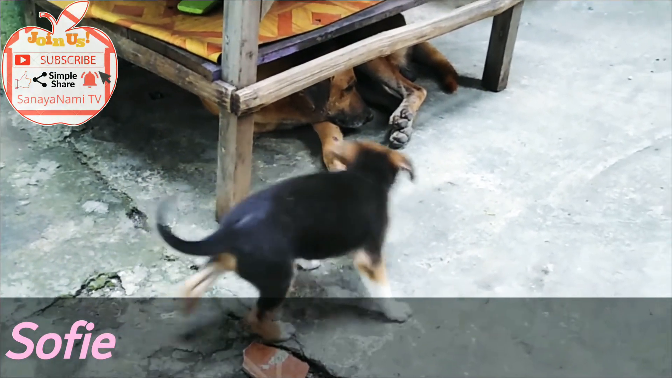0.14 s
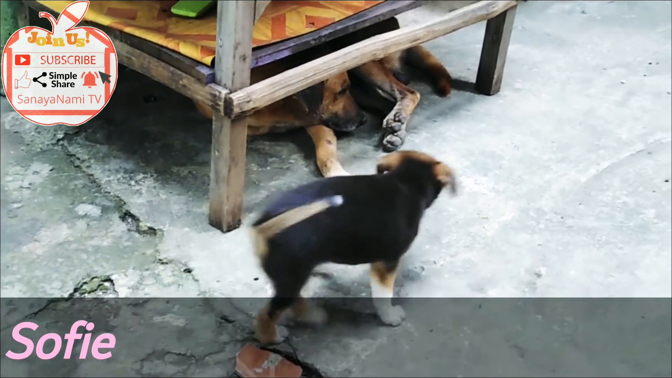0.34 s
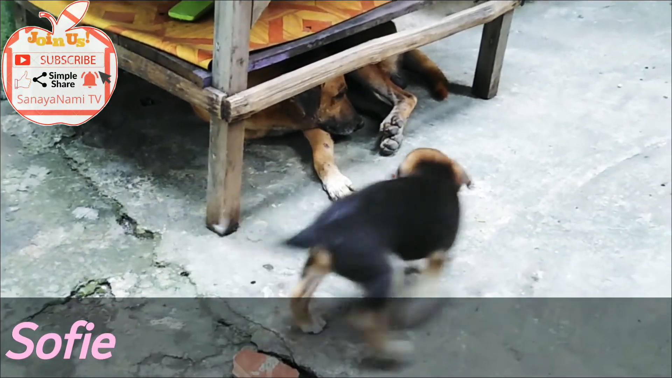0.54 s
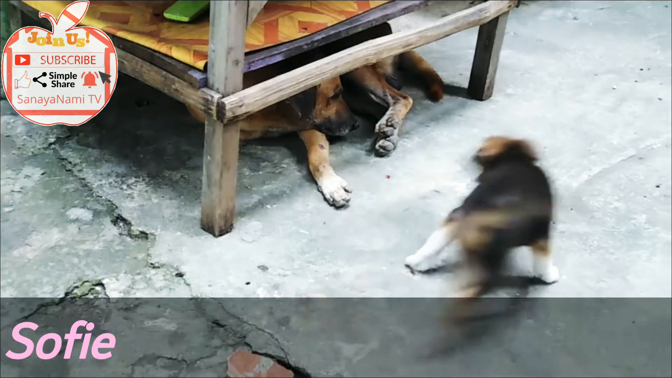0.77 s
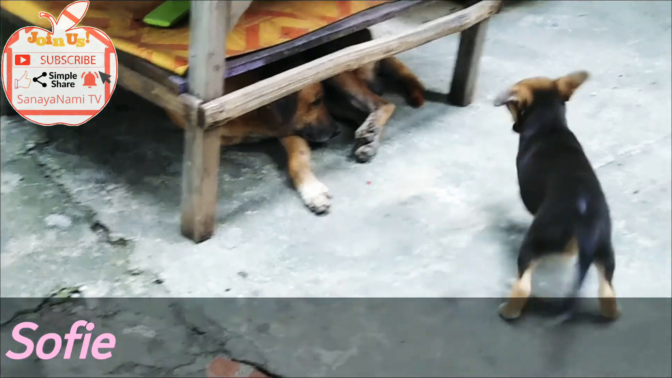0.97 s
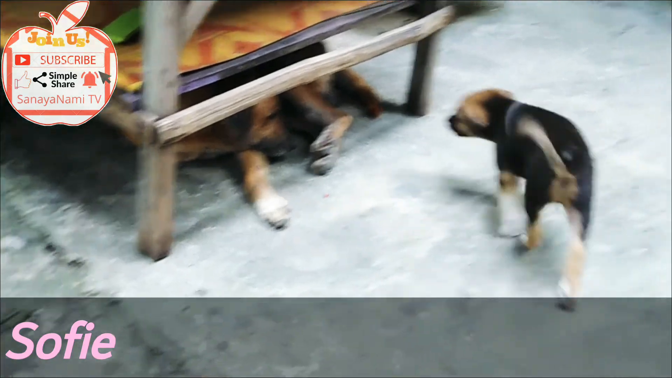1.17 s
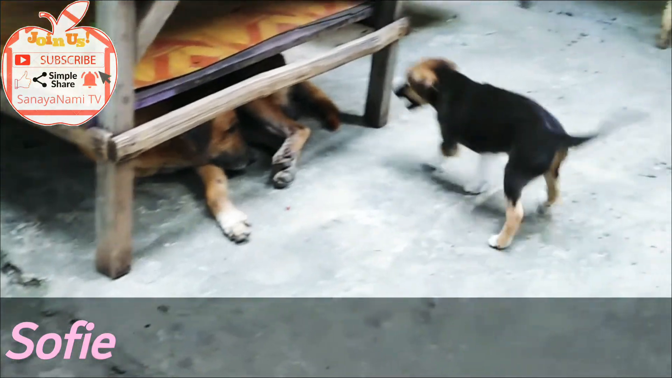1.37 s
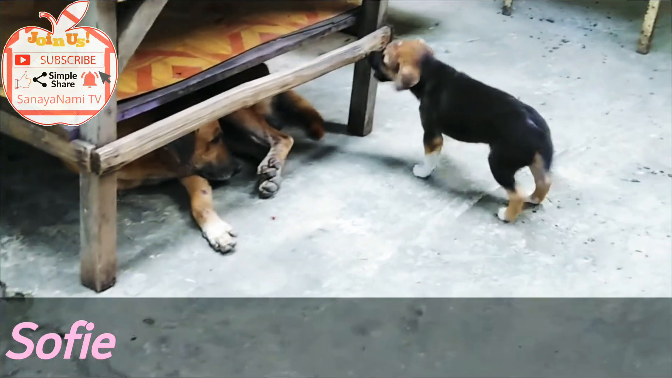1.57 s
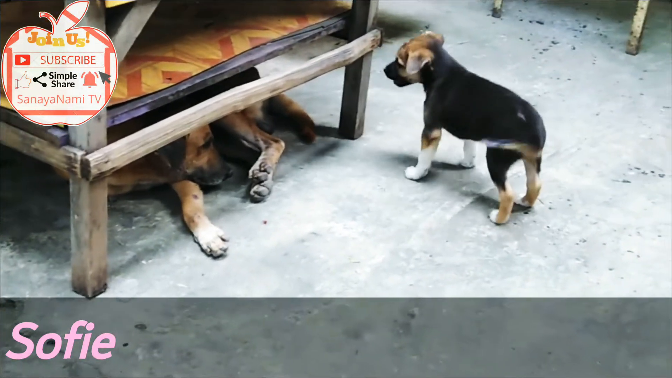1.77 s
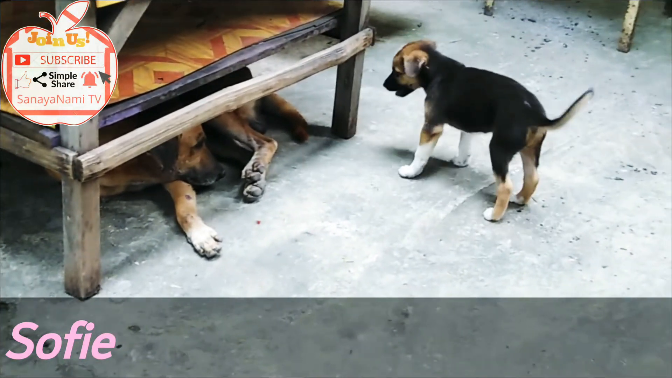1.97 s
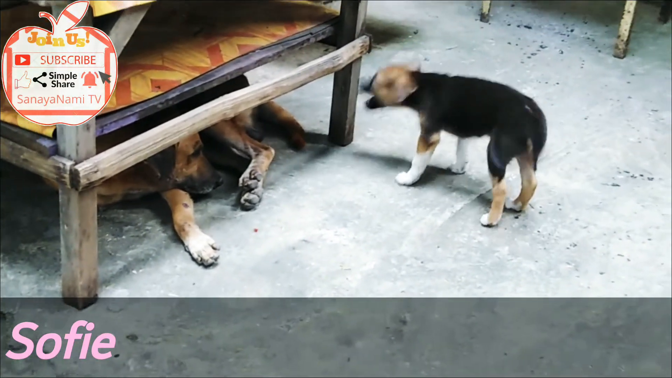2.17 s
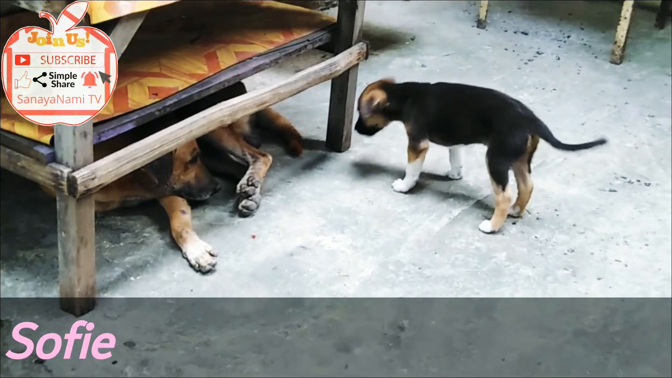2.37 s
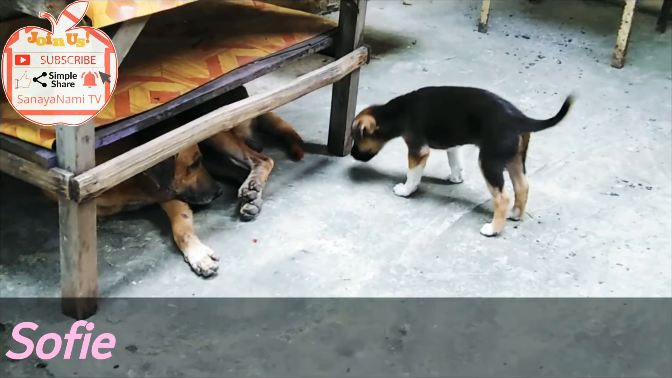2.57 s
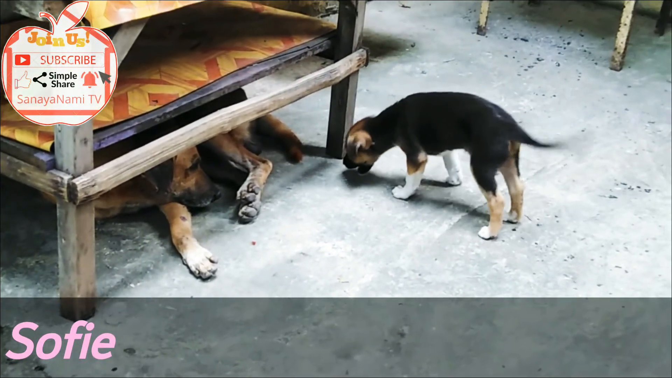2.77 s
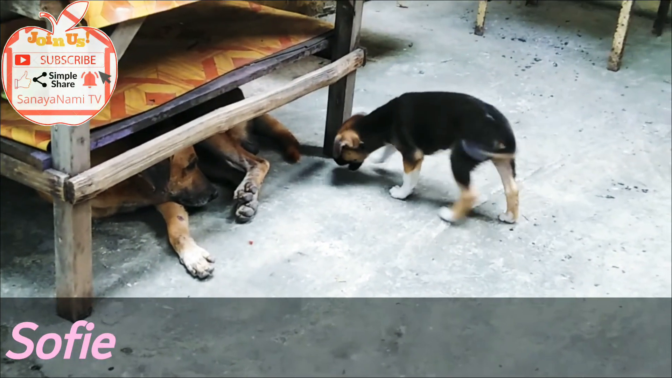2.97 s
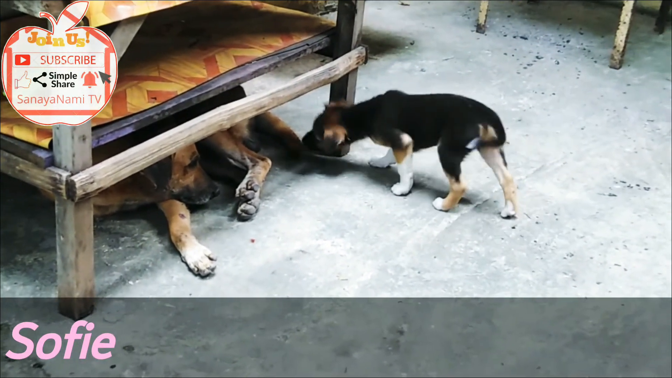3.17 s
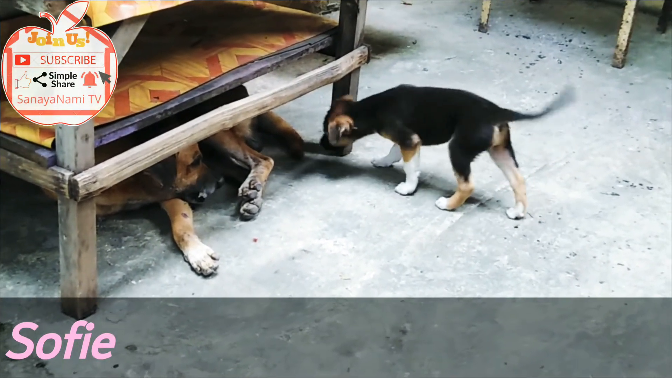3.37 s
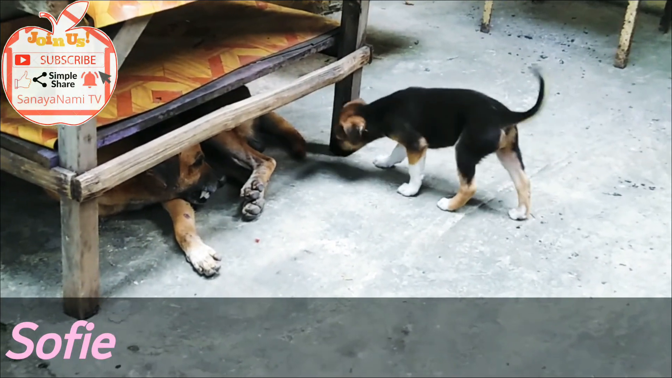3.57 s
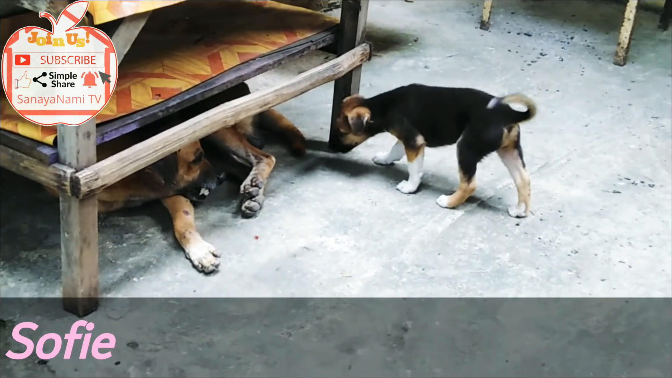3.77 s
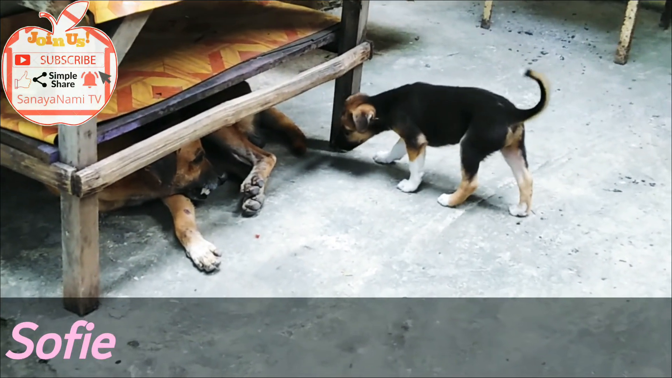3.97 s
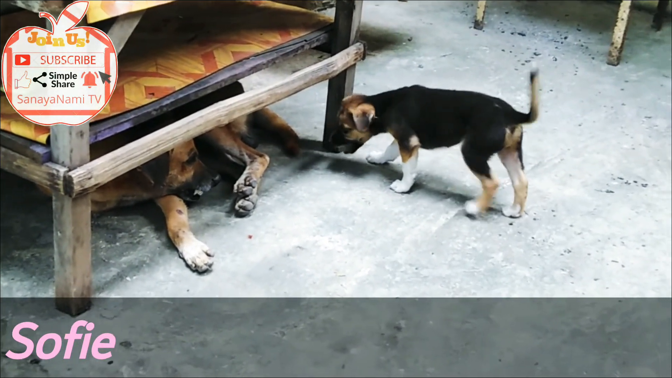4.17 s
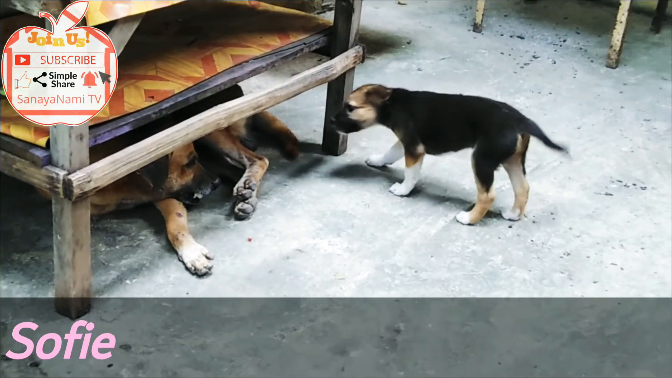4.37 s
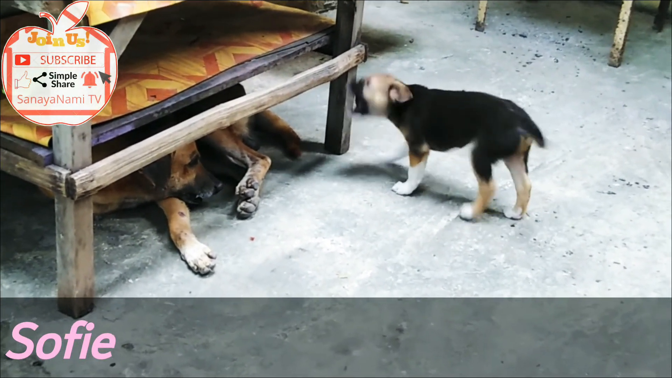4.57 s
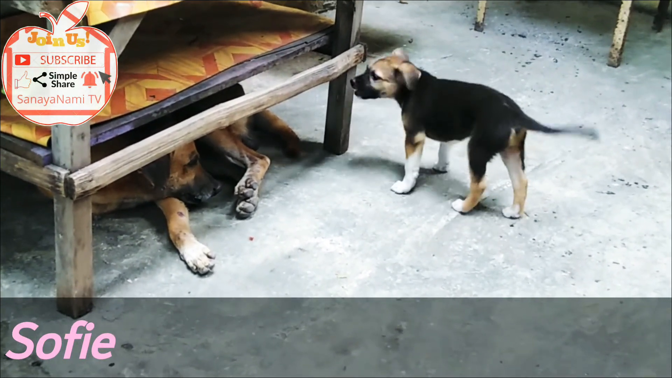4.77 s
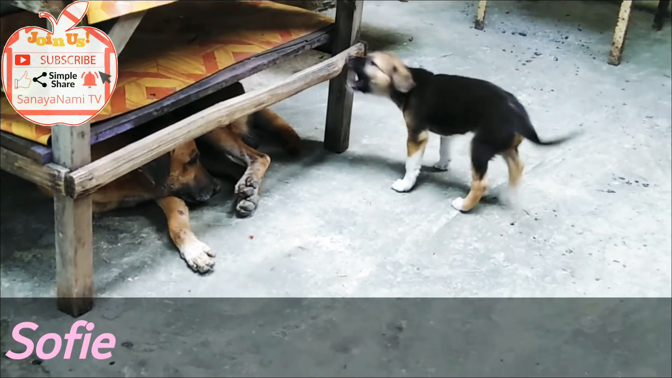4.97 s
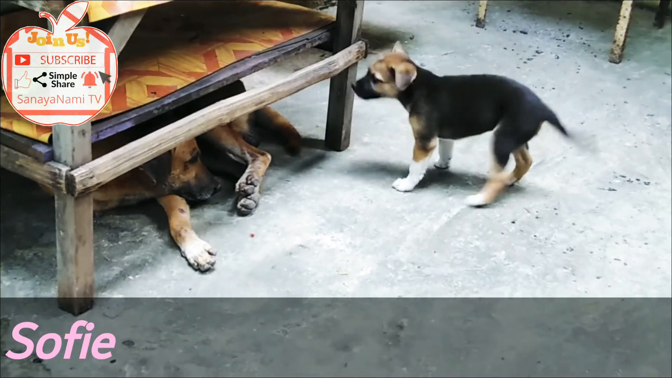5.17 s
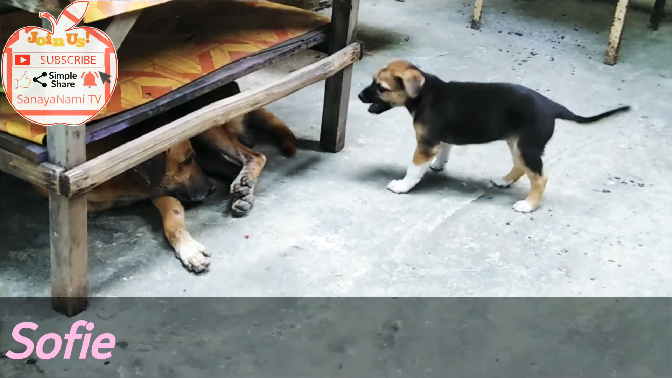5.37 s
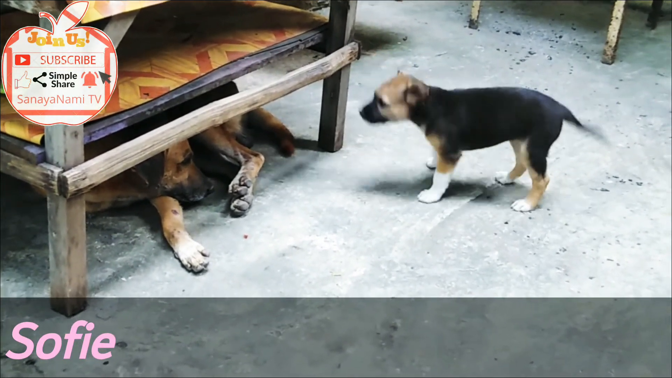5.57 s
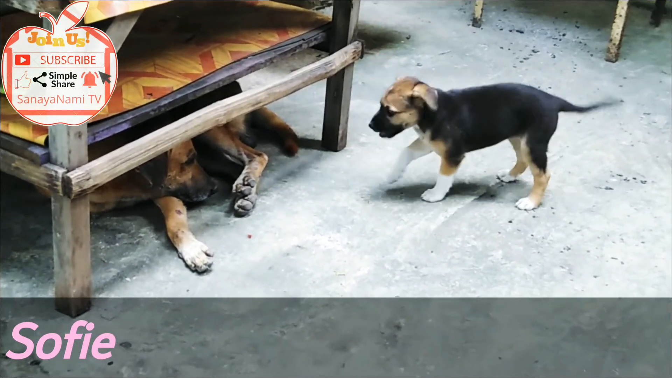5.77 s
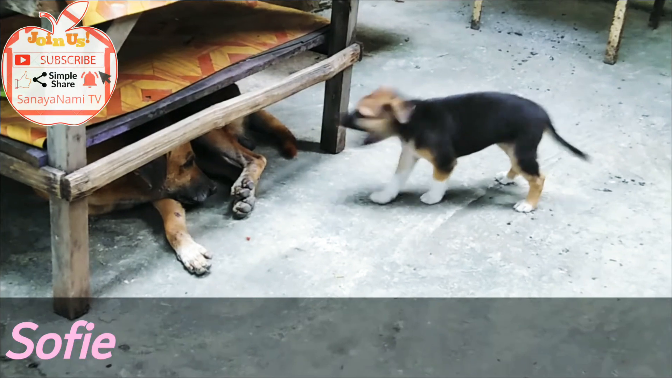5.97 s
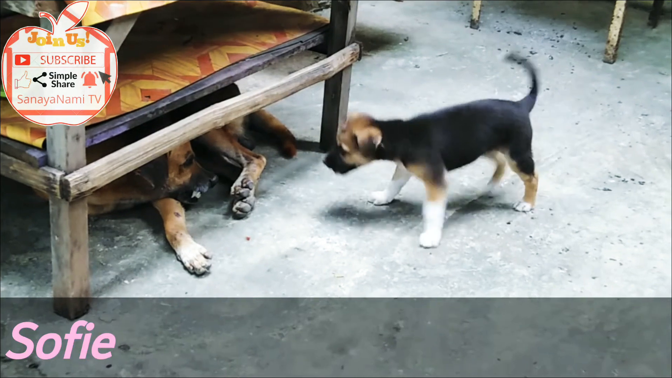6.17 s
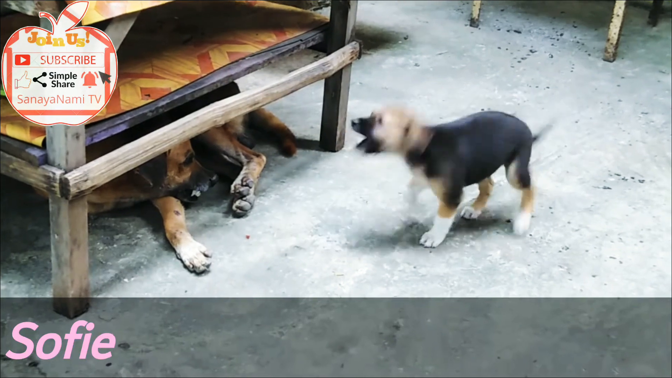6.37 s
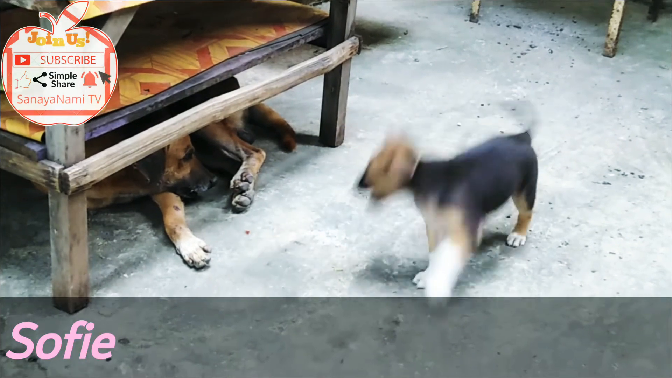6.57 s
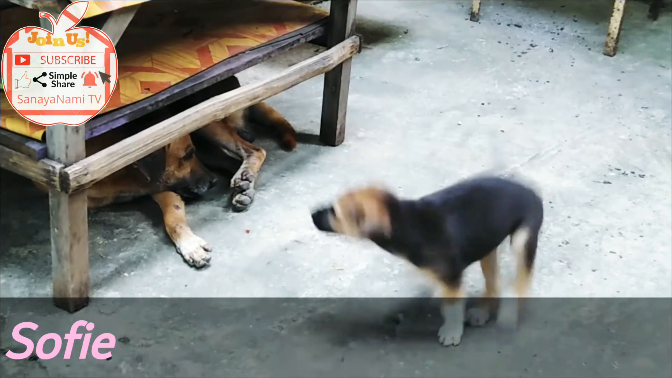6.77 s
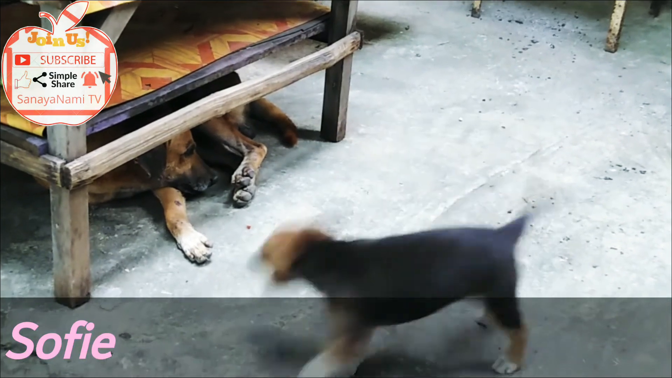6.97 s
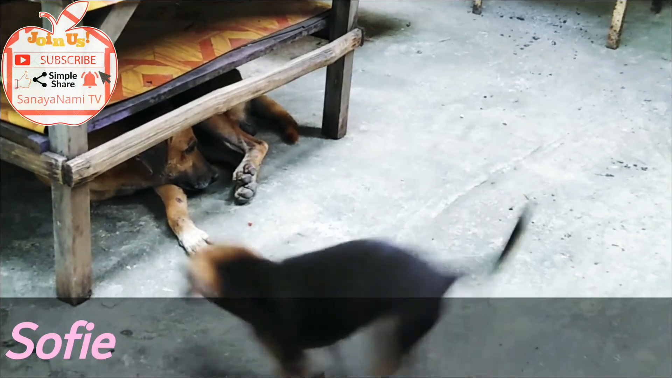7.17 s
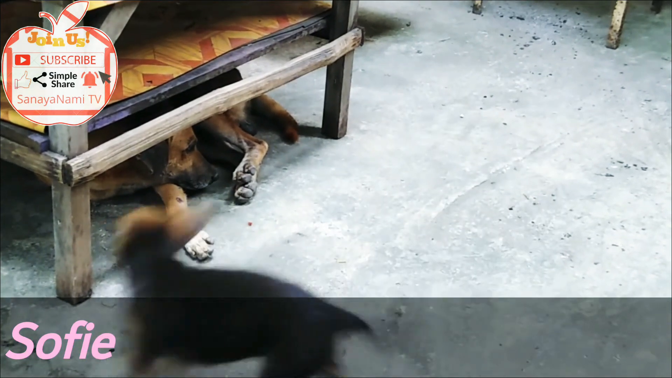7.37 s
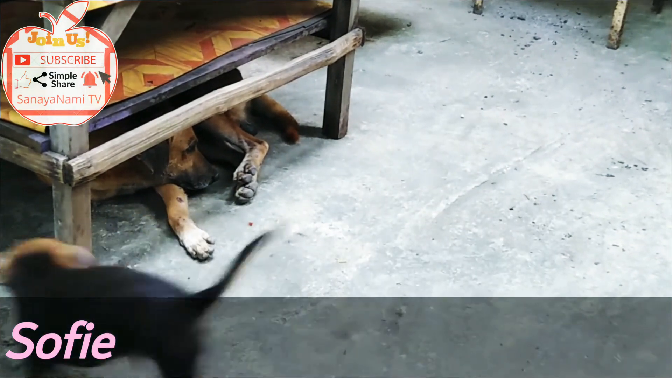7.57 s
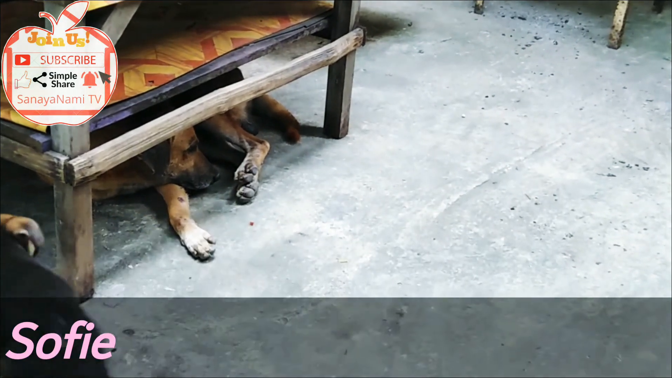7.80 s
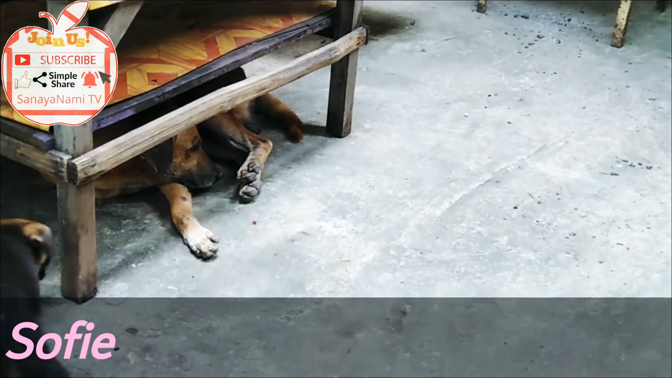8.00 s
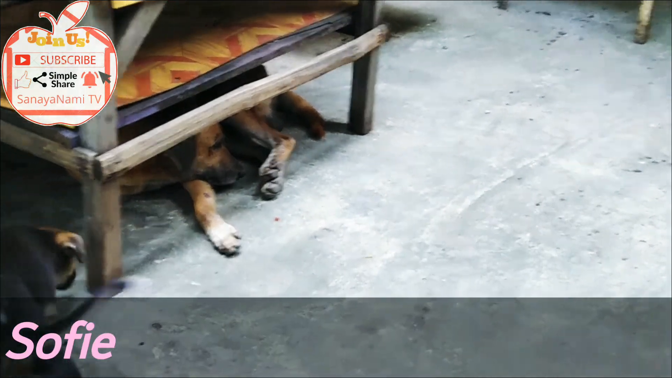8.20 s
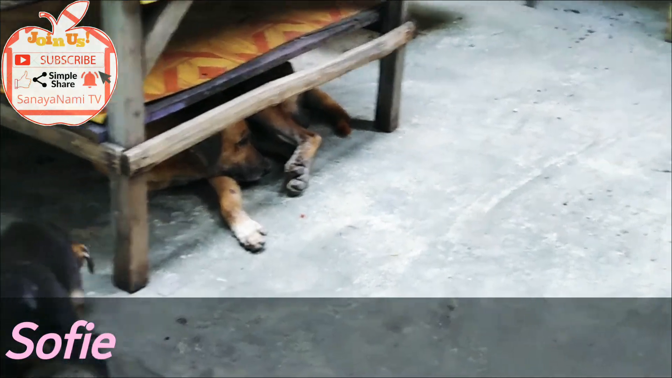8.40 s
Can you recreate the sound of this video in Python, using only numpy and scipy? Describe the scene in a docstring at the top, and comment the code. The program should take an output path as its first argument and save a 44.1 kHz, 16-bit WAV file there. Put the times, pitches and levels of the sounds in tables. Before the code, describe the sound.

A puppy close by barks sharp, hoarse, overloading yaps on a concrete floor, with sniffs, scuffing paws, faint hens and distant roosters behind.

```python
"""A puppy yaps on a concrete floor under a roof, close to a phone whose two microphones overload.
Its hoarse yaps are swept partials and air noise in a throat; each ends in a low falling note.
Between them come grunts and claw ticks (decaying or stacked sines), sniffs and sliding paws (noise).
Roosters and hens, farther off, are hoarse stacks of sines over the yard's hiss, murmur and rumble."""
import sys
import numpy as np
from scipy import signal
from scipy.fft import rfft, irfft, next_fast_len
from scipy.io import wavfile
from scipy.ndimage import uniform_filter1d, map_coordinates

SR = 44100
rng = np.random.default_rng(int(sys.argv[2]) if len(sys.argv) > 2 else 0)


def unload_audio(sound):
    """Save the sound as a 16-bit wav file, at the path given as the first command line argument."""
    columns = np.transpose(np.atleast_2d(sound))
    # keep every value between -1 and 1, then stretch to whole-number steps
    steps = np.round(np.clip(columns, -1, 1) * 32767)
    wavfile.write(sys.argv[1], SR, steps.astype(np.int16))


N = 372185


def amp(db):
    """Amplitude factor of a level in dB."""
    return 10 ** (np.asarray(db) / 20)


def unit(x):
    """The sound scaled to rms 1."""
    return x / np.sqrt(np.mean(x ** 2) + 1e-20)


def along(points, hz):
    """Values at hz between (Hz, value) points on a log frequency axis."""
    f, v = np.transpose(points)
    return np.interp(np.log(hz + 1), np.log(f + 1), v)


def curves(rows):
    """One value per sample for each column after the time."""
    s, *cols = np.transpose(rows)
    return [np.interp(np.arange(N) / SR, s, c) for c in cols]


def sounding(tables, fade):
    """1 inside each table's time span, 0 between, with edges softened over fade seconds."""
    gate = np.zeros(N)
    for rows in tables:
        first, last = round(rows[0][0] * SR), round(rows[-1][0] * SR)
        gate[max(first, 0):last + 1] = 1
    return uniform_filter1d(gate, int(fade * SR) + 1)


def wobble(rate):
    """A smooth random curve with rate knots a second."""
    knots = rng.standard_normal(int(N * rate / SR) + 4)
    return map_coordinates(knots, [np.arange(N) * rate / SR])


def filtered(x, response):
    """The sound x through a complex response of frequency."""
    m = next_fast_len(N + SR // 2)
    return irfft(rfft(x, m) * response(np.fft.rfftfreq(m, 1 / SR)), m)[..., :N]


def stack(pitch, orders):
    """Sines on multiples of a pitch curve."""
    phase = 2 * np.pi * np.cumsum(pitch) / SR
    return sum(np.sqrt(2) * amp(db) * np.sin(round(k) * phase) for k, db in orders)


# How alike the left and right microphones hear. Each row: frequency in Hz, likeness from 0 to 1.
ALIKE = [(60, 0.83), (290, 0.87), (630, 0.11), (1400, 0.028)]


def rush(spectrum, patchy_db):
    """Stereo noise of rms 1 with patches of random gain; mid and side shares set the likeness."""
    z = signal.stft(rng.standard_normal((2, N)), nperseg=512)[2]
    field = uniform_filter1d(uniform_filter1d(rng.standard_normal(z.shape[1:]), 5, 0), 12, 1)
    pair = signal.istft(z * amp(patchy_db * unit(field)), nperseg=512)[1][:, :N]

    def mid_side(hz):
        turn = np.arccos(np.clip(along(ALIKE, hz), -1, 1)) / 2
        return amp(along(spectrum, hz)) * [np.cos(turn), np.sin(turn)]

    mid, side = filtered(pair, mid_side)
    return unit(np.array([mid + side, mid - side]))


# Decay of the sound under the roof. Each row: frequency in Hz, t60 in seconds.
SHELTER = [(200, 0.34), (1400, 0.26), (4000, 0.28), (10000, 0.13)]


def shelter(x, wet_db):
    """Direct sound plus a decaying noise tail per microphone, drawn anew every half second."""
    out, step = np.zeros((2, N + SR)), SR // 2
    for start in range(0, N, step):
        hz, t, z = signal.stft(rng.standard_normal((2, SR // 3)), SR, nperseg=256)
        shared = along(ALIKE, hz)[:, None] * 3
        # long waves reach both microphones alike
        z[1] = (z[1] + shared * z[0]) / np.sqrt(1 + shared ** 2)
        decay = amp(-60 * t / along(SHELTER, hz)[:, None])
        tail = signal.istft(z * decay, SR, nperseg=256)[1]
        tail = amp(wet_db) * tail / np.linalg.norm(tail[0])
        tail[0, 11] += 1  # direct sound, 11 samples later at the left microphone
        tail[1, 0] += 1
        wet = signal.fftconvolve(x[None, start:start + step], tail, axes=1)
        out[:, start:start + wet.shape[1]] += wet
    return out[:, :N] / np.sqrt(1 + amp(wet_db) ** 2)


# Plateau under the throat resonances. Each row: frequency in Hz, gain in dB.
RASP = [(30, -63), (200, -41.5), (900, -31), (6000, -28.5), (9000, -50.5), (15000, -32)]
# Widths of the three throat resonances, in Hz.
WIDTHS_HZ = [190, 550, 950]


def throat(hz, centres, levels_db):
    """Gain at hz of three moving resonances over a low plateau."""
    humps = sum(amp(db) / (1 + ((hz - centre) / (width / 2)) ** 2)
                for centre, width, db in zip(centres, WIDTHS_HZ, levels_db))
    chest = amp(-21) / (1 + ((hz - 270) / 90) ** 2)  # lifts the fundamental when the pitch is low
    return humps + chest + amp(along(RASP, hz))


# The puppy's yaps, close by. Each row: start in seconds; then, in seconds after the start, the end of
# the rise, the mouth closed, the end of the voice; level open and closed in dB before the overload push;
# height of the pitch arch in Hz; first resonance open and closed in Hz, second open and closed in Hz;
# second and third resonance in dB; roughness from 0 to 1; bench ring in dB; falling note in dB.
YAPS = [(-.1, 0.018, 0.11, 0.12, -12, -9.5, 669.4, 1700, 1670, 3150, 3080, -19, -25, 0.23, -13, -21.5),
        (.489, .015, 0.063, 0.14, -9, -6, 722.2, 1690, 1391, 3280, 2500, -1, -8.5, 0.28, 2, -49.5),
        (1.06, 0.043, .1, 0.14, -9, -9, 809, 1970, 1657, 2950, 2890, -7.5, -15.5, 0.33, -17, -31),
        (1.525, 0.027, 0.095, .14, -9, -8.5, 787.2, 1606, 1600, 3030, 2374, -0.5, -6.5, 0.31, -9.5, -37),
        (2.143, 0.021, 0.081, 0.15, -7.5, -6.5, 722, 1765, 1430, 3086, 2600, -3.5, -13.5, 0.25, -7.5, -35.5),
        (4.226, 0.018, 0.074, .14, -9, -6, 804, 1640, 1640, 2954, 2621, -7.5, -6, 0.29, -16, -31.5),
        (4.566, 0.017, 0.09, .16, -8, -6.5, 703.8, 1699, 1431, 3092, 2350, 0.5, -9.5, 0.28, -5.5, -29),
        (4.935, 0.018, 0.078, 0.16, -8, -6, 720.8, 1550, 1408, 2912, 2370, 0, -9, 0.27, 0, -30),
        (5.472, 0.015, 0.076, .15, -8.5, -6, 701.4, 1730, 1345, 2760, 2330, -2, -6, .1, 4, -24),
        (5.974, 0.026, .1, .15, -8.5, -6.5, 698, 1712, 1428, 2730, 2425, -0.5, -9, .12, 1, -23),
        (6.342, 0.023, 0.082, 0.15, -8, -6.5, 702.4, 1644, 1426, 2860, 2340, 1.5, -6.5, 0.15, 8.5, -45),
        (6.705, 0.021, 0.077, 0.15, -7.5, -6.5, 700.4, 1430, 1456, 2930, 2488, -1.8, -10, 0.24, 0.5, -34),
        (7.05, 0.023, 0.073, .17, -8.5, -7, 684, 1410, 1456, 2661, 2591, -2.5, -7.5, 0.22, 0.5, -24),
        (7.445, 0.027, 0.074, 0.15, -8.5, -7, 682.3, 1510, 1346, 2773, 2490, -1.5, -5, 0.29, -2, -30)]
# Resonance levels through a yap, in dB added to those of its row: at the start, top, half-way to
# closing, closing, end of the voice, end of the release.
SECOND_MOVES_DB = [-23.5, -11, -1, -3.5, -6, -3.5]
THIRD_MOVES_DB = [-35.5, -14.5, -0.5, -3.5, -7.5, 13.5]
ONSET_DB, SAG_DB = -14, -7  # start against the open level; change from closing to the end of the voice
RELEASE_S, RELEASE_DB = 0.16, -29.5  # dying away after the voice
FIRST_HALF_WAY, SECOND_HALF_WAY = 0.46, 0.94  # share of each resonance's move done half-way to closing
DIP_DB = -1.5  # level dip half-way to closing
REST_HZ = 240  # pitch between yaps
ARCH_LEAD_S, ARCH_OVER_S = .004, .065  # pitch arch: lead on the yap, length beyond the voiced part
JITTER = .11  # pitch scatter at roughness 1, as a share of the pitch


def yap_shapes():
    """Six knots a yap for level, resonances and roughness as the mouth opens and closes."""
    tables = []
    for (s, rise, closing, voiced, open_db, closed_db, _, one_open, one_closed,
         two_open, two_closed, second_db, third_db, rough, *_) in YAPS:
        times = [0, rise, (rise + closing) / 2, closing, voiced, voiced + RELEASE_S]
        times = s + np.maximum.accumulate(times)
        end_db = closed_db + SAG_DB
        levels = [open_db + ONSET_DB, open_db, (open_db + closed_db) / 2 + DIP_DB,
                  closed_db, end_db, end_db + RELEASE_DB]
        one = np.array([0, 0, FIRST_HALF_WAY, 1, 1, 1])
        two = np.array([0, 0, SECOND_HALF_WAY, 1, 1, 1])
        tables.append(np.transpose([
            times, levels,
            one_open + one * (one_closed - one_open),
            two_open + two * (two_closed - two_open),
            second_db + np.array(SECOND_MOVES_DB),
            third_db + np.array(THIRD_MOVES_DB),
            np.full(len(times), rough)]))
    return tables


def yap_pitch():
    """A resting pitch with one rising and falling arch for each yap."""
    pitch = np.full(N + 2 * SR, REST_HZ, float)  # one spare second at each end
    for s, _, _, voiced, _, _, top_hz, *_ in YAPS:
        u = np.linspace(0, 1, round((voiced + ARCH_OVER_S) * SR), endpoint=False)
        arch = (top_hz - REST_HZ) * np.sin(np.pi * u ** .75) ** .9
        pitch[SR + round((s - ARCH_LEAD_S) * SR):][:len(u)] += arch
    return pitch[SR:SR + N]


def yaps():
    """Partials of an unsteady pitch and air noise pulsing with it sweep through the moving throat."""
    tables = yap_shapes()
    db, first_hz, second_hz, second_db, third_db, rough = curves(np.concatenate(tables))
    third_hz = 4665 * (first_hz / 1500) ** 0.25
    shape = np.array([first_hz, second_hz, third_hz, second_db, third_db])
    air_share = np.clip(rough, 0, 1)
    pitch = yap_pitch() * (1 + JITTER * air_share * wobble(150))
    phase = 2 * np.pi * np.cumsum(pitch) / SR
    on = sounding(tables, fade=0.0081)
    live = np.flatnonzero(on > 0)
    slow = live[::32]  # the throat moves slowly
    tone = np.zeros(N)
    for k in range(1, 16):
        size = throat(k * pitch[slow], shape[:3, slow], [0, *shape[3:, slow]])
        tone[live] += np.interp(live, slow, size) * np.cos(k * phase[live] + k * k)
    tone /= np.sqrt(uniform_filter1d(tone ** 2, 441) + 1e-6)  # even level over 10 ms

    pulsing = rng.standard_normal(N) * (1 + np.cos(phase))
    hz, frames, z = signal.stft(pulsing, SR, nperseg=256)
    now = shape[:, np.minimum((frames * SR).astype(int), N - 1)]
    gain = throat(hz[:, None], now[:3], [0, *now[3:]])
    air = unit(signal.istft(z * gain / np.linalg.norm(gain, axis=0), SR, nperseg=256)[1][:N])

    voice = np.sqrt(1 - air_share) * tone * amp(2.5 * wobble(250))
    voice += np.sqrt(air_share) * air * amp(3 * wobble(80))
    push_db = 6 * np.clip((db + 17.5) / 9, 0, 1.5)  # drives the loudest part past the microphones' top
    return amp(db + push_db) * on * voice


RING_HZ, RING_WIDTH_HZ = 1399.6, 19.2


def bench(voice):
    """A hollow under the bench, one narrow resonance, answers more when the yap is aimed at it."""
    aimed = []
    for s, *_, ring_db, _ in YAPS:
        aimed += [(s, ring_db), (s + .25, ring_db)]
    aimed_db, = curves(aimed)

    def hollow(hz):
        loss = 1j * hz * RING_WIDTH_HZ
        return loss / (RING_HZ ** 2 - hz * hz + loss)

    return filtered(voice * amp(aimed_db), hollow)


# Grunts between the yaps, one list a grunt. Each row: time in seconds, pitch in Hz before the wobble,
# level in dB before its flutter and the partials.
GRUNTS = [
    [(1.18, 306.1, -47), (1.192, 324.6, -30), (1.248, 225.2, -27.5), (1.332, 236.2, -33.5),
     (1.37, 212.1, -35)],
    [(3.19, 230.3, -61), (3.226, 249.3, -26.5), (3.318, 208.6, -50.5), (3.35, 253.5, -47), (3.42, 230, -99)],
]
# Partials of a grunt. Each row: multiple of the pitch, level in dB.
GRUNT_ORDERS = [(1, 4), (2, -6.5), (3, -2.5), (4, -15.5), (5, -6.5), (6, -0.5), (7, -2), (8, -29),
                (9, -39.5), (10, -70), (11, -22.5), (12, -14)]
SLACK_LEAD_S, SLACK_S = .025, .09  # falling note: start before the voice ends, length


def low_notes():
    """Clean low voice: grunts, and the note that slides down after a yap as the folds slacken."""
    pitch, db = curves(sum(GRUNTS, []))
    unsteady = wobble(90)
    pitch = pitch * (1 + .015 * unsteady)
    db = db - 1.5 * np.abs(unsteady)
    out = amp(db) * sounding(GRUNTS, fade=.015) * stack(pitch, GRUNT_ORDERS)
    u = np.arange(round(SLACK_S * SR)) / (SLACK_S * SR)
    phase = 2 * np.pi * np.cumsum(215 + 220 * (1 - u) ** 1.7) / SR  # 435 down to 215 Hz
    note = np.sin(np.pi * u) * (np.sin(phase) + .5 * np.sin(2 * phase) + 0.7 * np.sin(3 * phase))
    for s, _, _, voiced, *_, note_db in YAPS:
        out[max(round((s + voiced - SLACK_LEAD_S) * SR), 0):][:len(u)] += amp(note_db) * note
    return out


WASH_T60_S = 0.44


def yap_wash():
    """Level of the wash in which each yap comes back from the yard: it swells, then dies away."""
    wash, after = np.zeros(N + 2 * SR), np.arange(SR) / SR  # one spare second at each end
    for s, _, _, voiced, _, closed_db, *_ in YAPS:
        decay_db = -60 * np.clip(after - voiced, 0, None) / WASH_T60_S
        swell = np.clip(after / voiced, 0, 1)
        wash[SR + round(s * SR):][:SR] += amp(closed_db + decay_db) * swell
    return wash[SR:SR + N]


# Yard noise in the treble. Each row: time in seconds, background hiss in dB, rising and dipping,
# before its left-right tilt, rustle in dB.
BEHIND = [(0, -52.5, -65), (.45, -52.5, -48.5), (1.0, -63.5, -46), (1.95, -62.5, -52), (2.63, -68, -46.5),
          (3.06, -57, -79), (3.26, -68, -49), (3.6, -56.5, -58), (3.92, -75, -66), (4.15, -55, -50),
          (5.3, -66.5, -47.5), (5.9, -51, -49.5), (7.0, -65.5, -44.5), (7.95, -57.5, -43.5),
          (8.23, -62, -58.5), (8.44, -66, -42)]
# Yard noise lower down. Each row: time in seconds, rumble in dB, murmur in dB.
YARD = [(0.0, -48, -37.5), (0.91, -48, -49), (1.74, -49, -35.5), (1.9, -48.5, -45.5), (2.87, -67, -46),
        (3.29, -47.5, -52.5), (5.03, -62.5, -41), (5.38, -48.5, -67), (5.69, -50.5, -39.5),
        (5.83, -64, -39), (6.98, -49, -37), (7.38, -50, -42.5), (7.66, -67.5, -34), (7.99, -60.5, -54.5),
        (8.44, -70, -108)]
# Spectra of the four noises. Each row: frequency in Hz, relative density in dB per Hz.
HISS = [(2650, -39.5), (4500, 0), (6770, -2.5), (8840, -9.5), (10000, -13), (13500, -23), (14800, -32),
        (15000, -76)]
RUSTLE = [(1180, -2.5), (2000, 10), (3340, 4), (4060, 9), (7000, -5), (9100, -66), (15400, -120)]
RUMBLE = [(15, -28.5), (25, -17), (54, 2), (74, 14), (91, 1), (200, -8), (260, -42), (440, -120)]
MURMUR = [(88, -34), (150, -8.5), (545, -18.5), (768, -2.5), (965, -16.5), (1210, 4), (2150, -20.5),
          (2300, -28.5), (2990, -53.5), (5060, -120)]
WASH_HISS_DB, WASH_RUSTLE_DB = -24, -11.5  # wash in each noise, relative to the yap's closed level
THIN_HZ = 6760  # the thin hiss lacks what lies below


def yard():
    """Patchy noises: hiss that also carries the sniffs, rustle, murmur and rumble; yaps wash back."""
    hiss_db, rustle_db = curves(BEHIND)
    rumble_db, murmur_db = curves(YARD)
    sniffs, thin_sniffs = sniff_levels()
    wash = yap_wash()
    hiss, rustle = rush(HISS, patchy_db=1.5), rush(RUSTLE, patchy_db=3)
    rumble, murmur = rush(RUMBLE, patchy_db=2), rush(MURMUR, patchy_db=3.5)
    thin_hiss = unit(filtered(hiss, lambda hz: 1 / (1 + (THIN_HZ / (hz + 1)) ** 8)))
    hissing = (amp(hiss_db) + sniffs + amp(WASH_HISS_DB) * wash) * hiss + thin_sniffs * thin_hiss
    hissing *= amp([[2], [-2]])  # louder at the left microphone
    rustling = (amp(rustle_db) + amp(WASH_RUSTLE_DB) * wash) * rustle
    return hissing + rustling + amp(rumble_db) * rumble + amp(murmur_db) * murmur


# Rooster crows, farther off: A in several spans, B in one. Each row: time in seconds,
# strongest partial in Hz before its waver, level in dB before its flutter and the partials.
CROW_A = [
    [(.07, 1262, -39), (.1, 1250, -39.5), (.44, 1150, -42), (.48, 1140, -59.5)],
    [(3.41, 1345, -41), (3.44, 1320, -39.5), (3.52, 1287, -39), (3.94, 1265, -35.5), (4.23, 1230, -42)],
    [(8.37, 1130, -55), (8.4, 1118, -46), (8.44, 1140, -46)],
]
CROW_B = [(2.54, 1840, -48), (2.6, 1838, -42), (3.17, 1682, -45), (3.5, 1614, -46), (3.75, 1575, -57)]
# Partials of each crow. Each row: multiple of the pitch, level in dB.
ORDERS_A = [(1, -43), (2, 3), (3, -33), (5, -18.5)]
ORDERS_B = [(1, -28), (2, -4), (3, 3), (6, -14), (7, -13.5)]


def roosters():
    """Two far crowing voices: hoarse, mostly falling stacks with fluttering level and pitch."""
    flutter_db, waver = 2.5, .011
    hz, db = curves(np.concatenate(CROW_A))
    level = amp(db + flutter_db * wobble(60)) * sounding(CROW_A, fade=0.023)
    one = level * stack(hz / 2 * (1 + waver * wobble(90)), ORDERS_A)  # the second partial is strongest
    hz, db = curves(CROW_B)
    level = amp(db + flutter_db * wobble(47)) * sounding([CROW_B], fade=0.024)
    two = level * stack(hz / 3 * (1 + 2 * waver * wobble(90)), ORDERS_B)  # here the third
    return one + two


# Sniffs. Each row: start in seconds, length in seconds, peak level in dB before the left-right tilt,
# share of thin hiss from 0 to 1.
SNIFFS = [(0.103, 0.28, -49.5, .3), (3.192, 0.39, -43, .15), (3.617, .55, -47.5, .9),
          (5.318, 0.242, -47.5, .5), (8.283, 0.22, -49.5, .3)]


def sniff_levels():
    """Levels of the full and the thin hiss as each sniff swells and fades in half a sine."""
    t = np.arange(N) / SR
    full, thin = np.zeros(N), np.zeros(N)
    for s, length, db, share in SNIFFS:
        puff = amp(db) * np.sin(np.pi * np.clip((t - s) / length, 0, 1))
        share = np.clip(share, 0, 1)
        full += puff * (1 - share)
        thin += puff * share
    return full, thin


# Hens clucking, farther off. Each row: start in seconds, level in dB before the flutter and the
# resonance, starting pitch in Hz, length in seconds.
CLUCKS = [(0.848, -43.5, 189.2, 0.03), (0.908, -37, 343, 0.031), (0.988, -38, 379, 0.041),
          (1.85, -31.5, 378, 0.084), (2.057, -40.5, 356.5, 0.15), (2.514, -39.5, 398, 0.02),
          (2.804, -46, 360.3, 0.037), (2.98, -34, 348, 0.031), (3.487, -45, 367, 0.11),
          (3.738, -42, 405, 0.24), (3.935, -46.5, 374.4, 0.2797), (4.485, -41, 386, 0.058),
          (7.779, -28.5, 193.5, 0.04), (7.973, -42.5, 188.4, 0.033), (8.038, -45, 398.5, 0.058),
          (8.162, -50, 377, 0.092), (8.263, -42.5, 408, 0.055)]
CLUCK_HZ, CLUCK_WIDTH_HZ = 753, 230  # the resonance


def hens():
    """Short, slightly falling stacks through one resonance; a fluttering level makes them hoarse."""
    out = np.zeros(N + SR)
    for s, db, hz, length in CLUCKS:
        t = np.arange(round(length * SR)) / SR
        phase = 2 * np.pi * hz * t * (1 - 0.019 * t / length)
        note = np.zeros(len(t))
        for k in range(1, 6):
            resonance = 1 / (1 + ((k * hz - CLUCK_HZ) / CLUCK_WIDTH_HZ) ** 2) ** 2
            note += resonance * np.sin(k * phase)
        out[round(s * SR):][:len(t)] += amp(db) * np.sin(np.pi * t / length) * note
    return out[:N] * amp(4 * wobble(70))


# Paws sliding close by. Each row: start in seconds, starting level in dB, t60 in seconds.
SCUFFS = [(.9, -35.5, 0.25), (2.047, -34.5, 0.8), (2.53, -36, 0.27), (2.99, -52, 0.29), (4.05, -54, 0.47),
          (4.16, -38, 0.25), (7.85, -42, 0.4), (8.288, -35.5, 0.46)]
# Spectrum of a scrape. Each row: frequency in Hz, relative density in dB per Hz.
SCRAPE = [(880, -62), (1500, -31), (1820, 0), (2090, -4), (3430, 0), (6300, -1.5), (8700, -33.5),
          (12000, -32), (15600, -64), (22000, -120)]


def paws():
    """Scrapes of patchy noise that start at once and die away."""
    t = np.arange(N) / SR
    level = sum(amp(db - 60 * np.abs(t - s) / t60) * (t >= s) for s, db, t60 in SCUFFS)
    return level * rush(SCRAPE, patchy_db=2)


# Claws on the concrete. Each row: time in seconds, level in dB before a 5 dB cut and the modes,
# ring time as a multiple of the usual.
TICKS = [(2.0464, -34, 0.33), (7.706, -27, 0.66), (8.159, -20.5, 1.7), (8.183, -31, 0.63)]
# Modes of a tick. Each row: frequency in Hz, mean level in dB, usual t60 in seconds.
TICK_MODES = [(2236, -3, .05), (6070, 5.5, 0.057), (6780, -4.5, .05), (10500, 2, .05), (11360, -6, 0.047),
              (13900, -9, .04)]


def claws():
    """Short ticks: the same few decaying modes at new random levels, plus a brief noise burst."""
    out, t = np.zeros(N + SR), np.arange(SR // 10) / SR
    for s, db, longer in TICKS:
        tick = .6 * amp(-60 * t / 0.014) * rng.standard_normal(len(t))
        for hz, level, t60 in TICK_MODES:
            mode_db = level + rng.normal(0, 3.2) - 60 * t / (t60 * longer)
            tick += amp(mode_db) * np.sin(2 * np.pi * hz * t)
        out[round(s * SR):][:len(t)] += amp(db - 5) * tick
    return out[:N]


def scene():
    """The puppy near the microphones and the birds farther off under the roof, with paws and yard."""
    voice = yaps()
    puppy = shelter(voice + bench(voice), wet_db=3.5) + shelter(low_notes() + claws(), wet_db=-6)
    far = shelter(roosters() + hens(), wet_db=5)
    return puppy + far + paws() + yard()


TOP_HZ = 15350  # the microphones' band limit


def record(dry):
    """The microphones clip and drop the deep bass; the band limit rings past full scale and is cut flat."""
    clipped = dry / (1 + np.abs(dry / .99) ** 10) ** (1 / 10)

    def band(hz):
        treble = np.where(hz < TOP_HZ, 1, amp(-17.5))
        return treble * (1j * hz / (70 + 1j * hz))

    return np.clip(filtered(clipped, band), -1, 1)


dry = scene()
out = record(dry)
unload_audio(out)
```